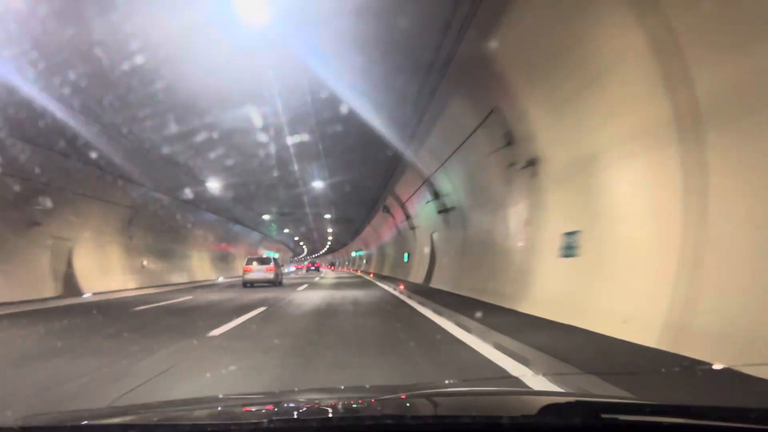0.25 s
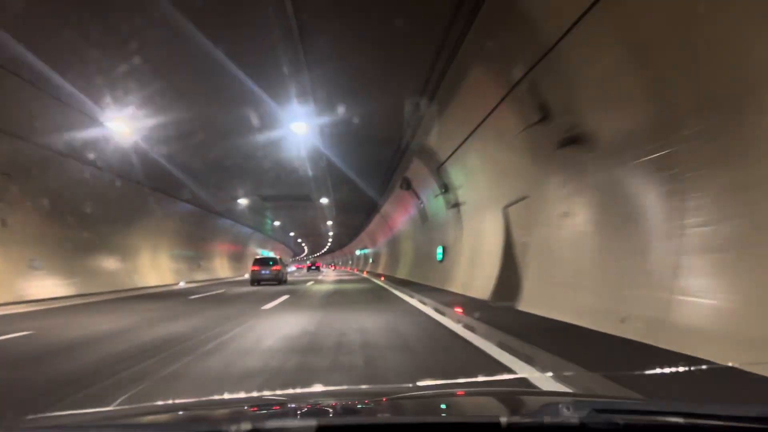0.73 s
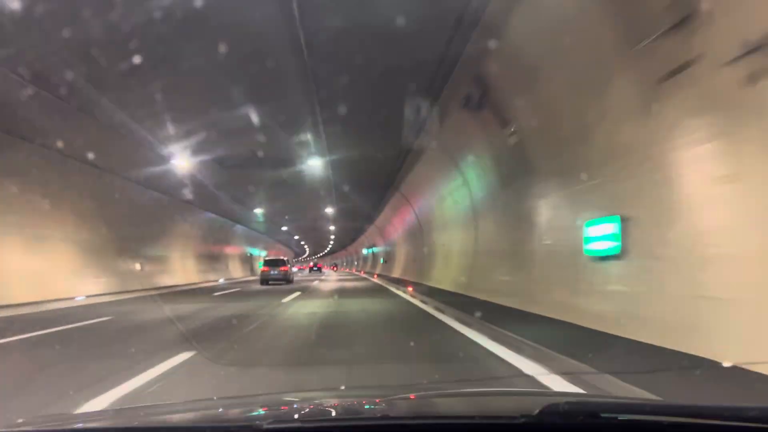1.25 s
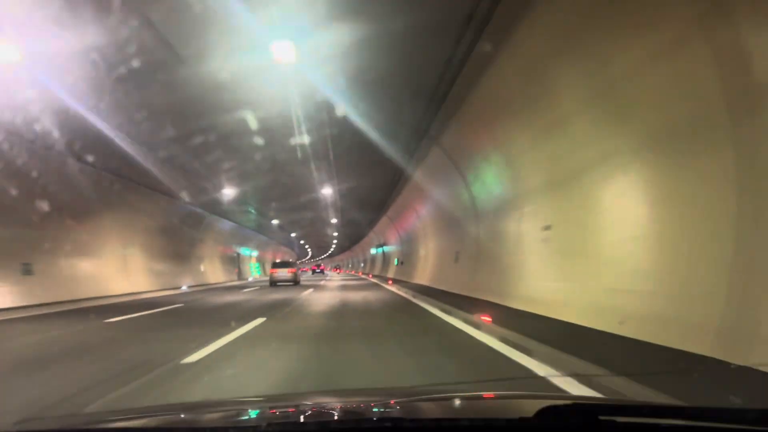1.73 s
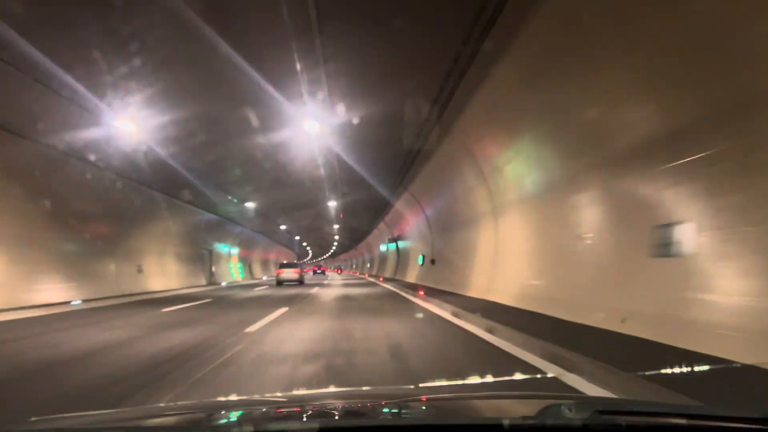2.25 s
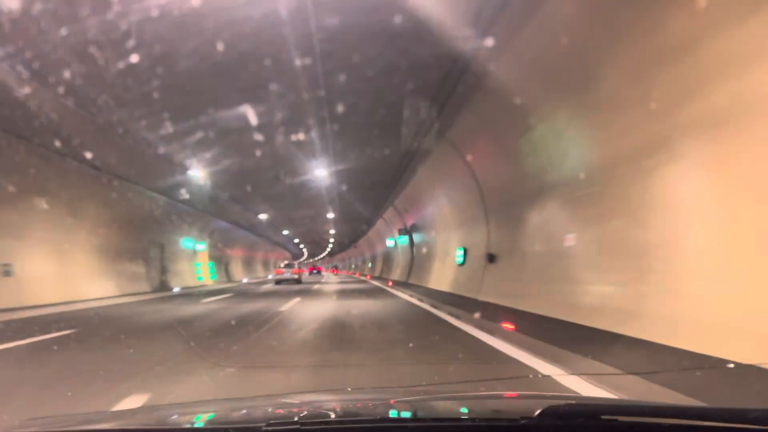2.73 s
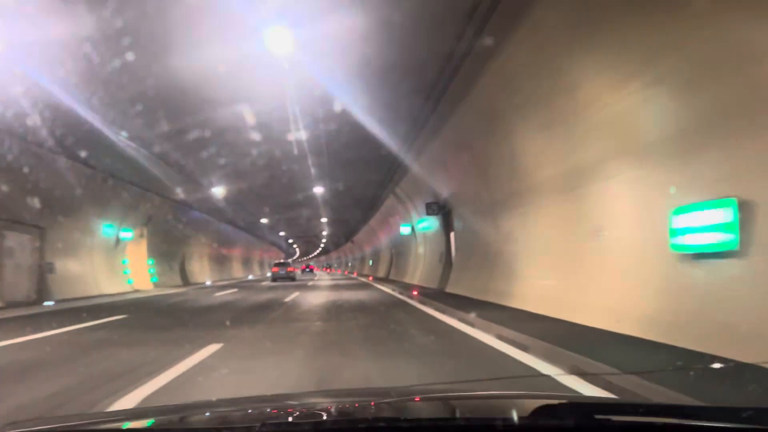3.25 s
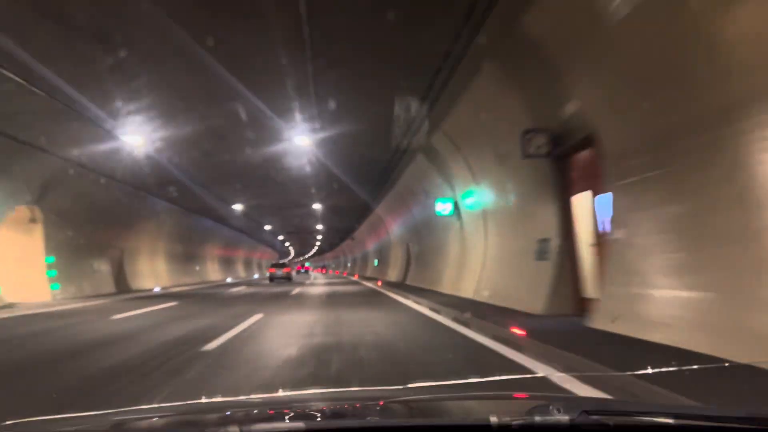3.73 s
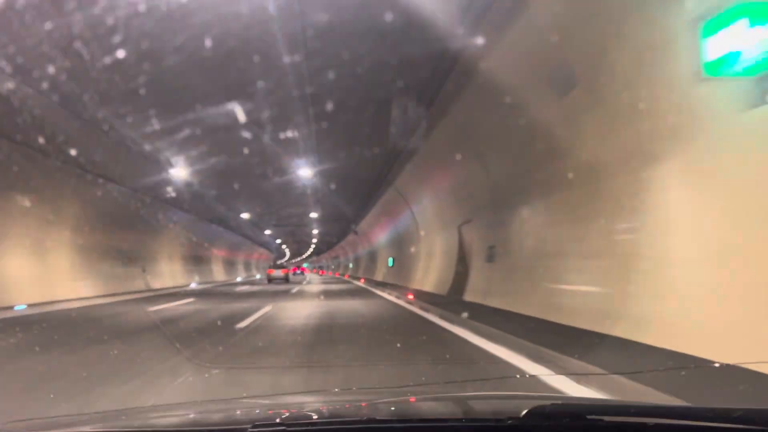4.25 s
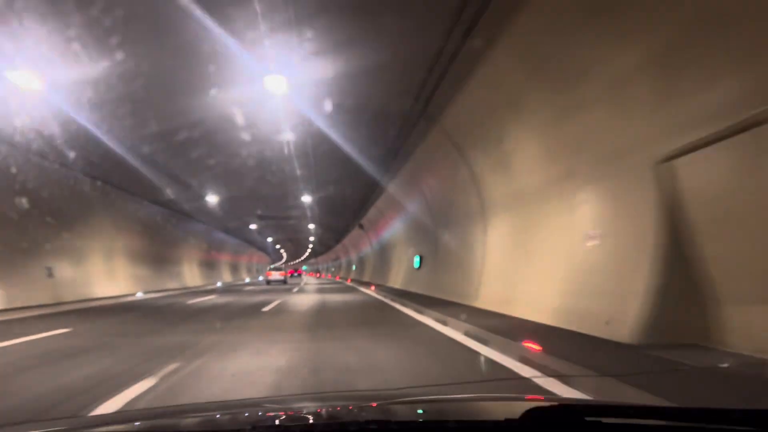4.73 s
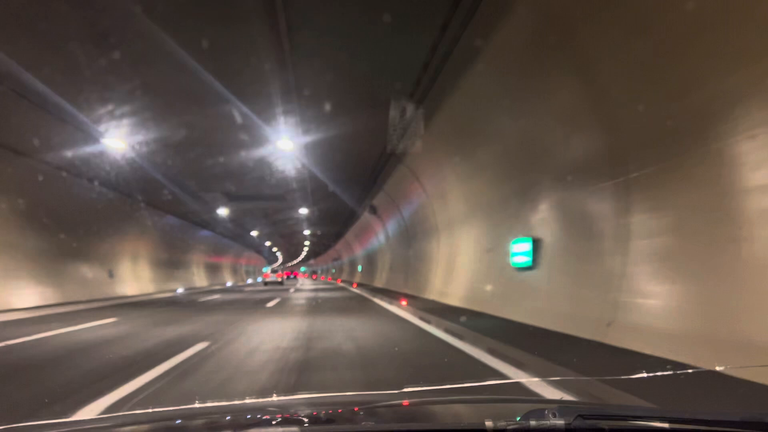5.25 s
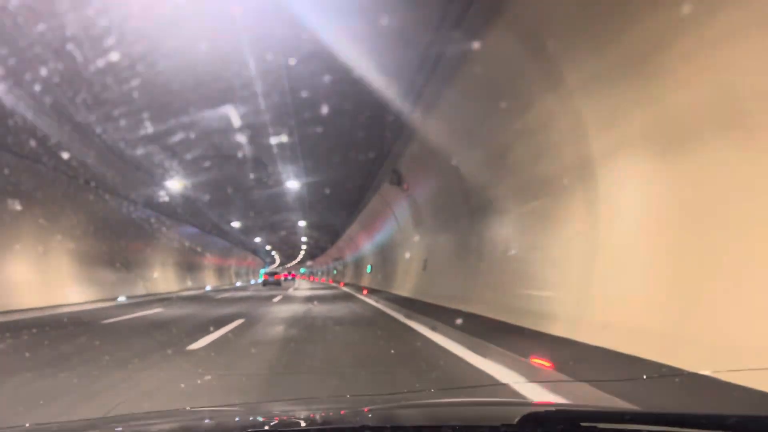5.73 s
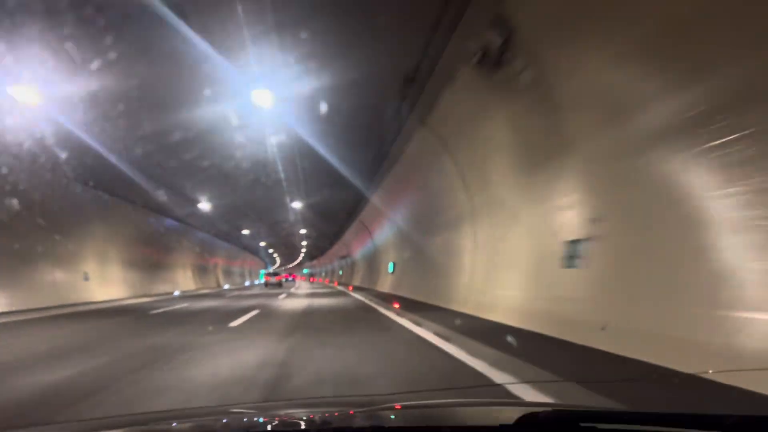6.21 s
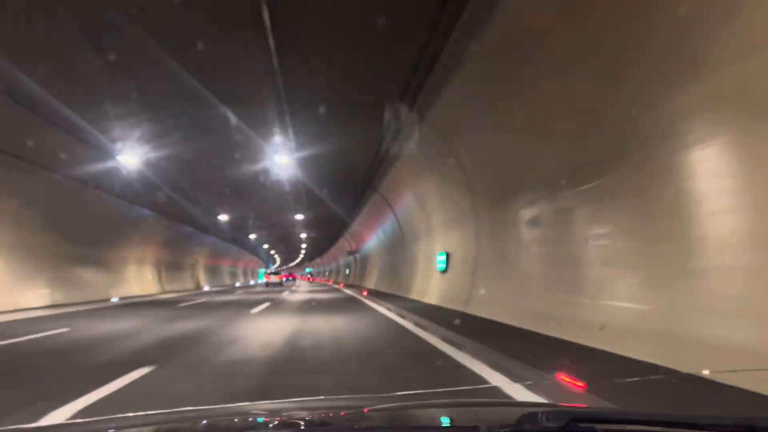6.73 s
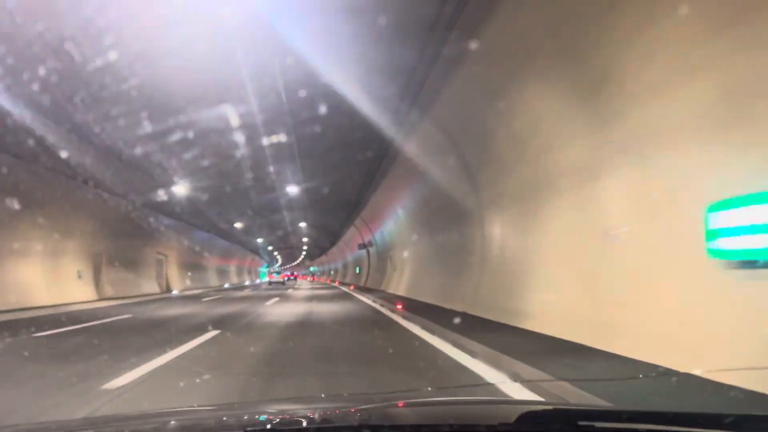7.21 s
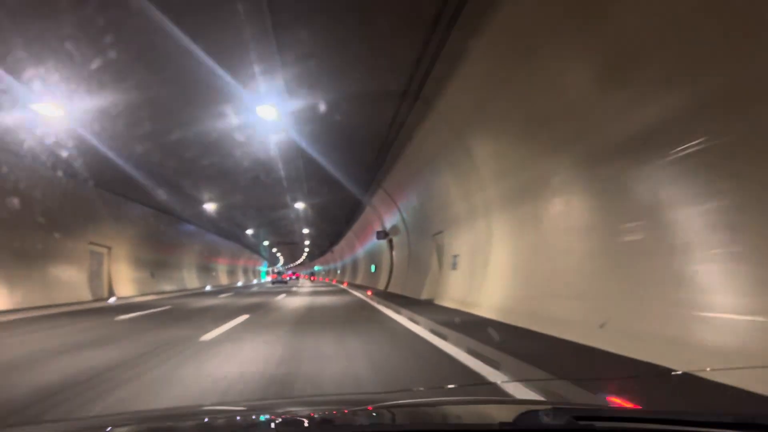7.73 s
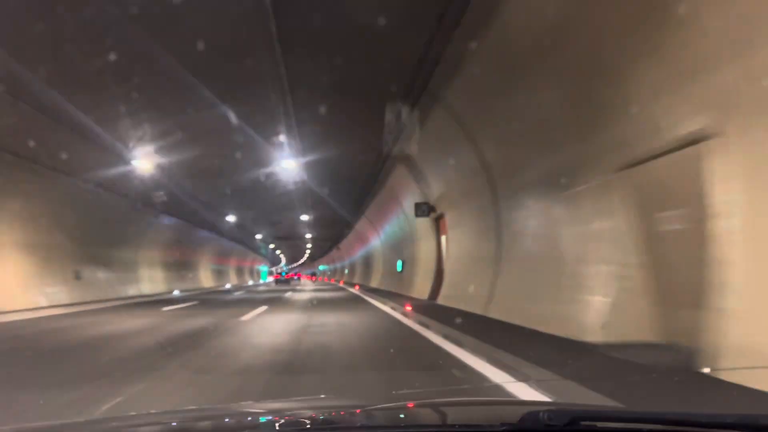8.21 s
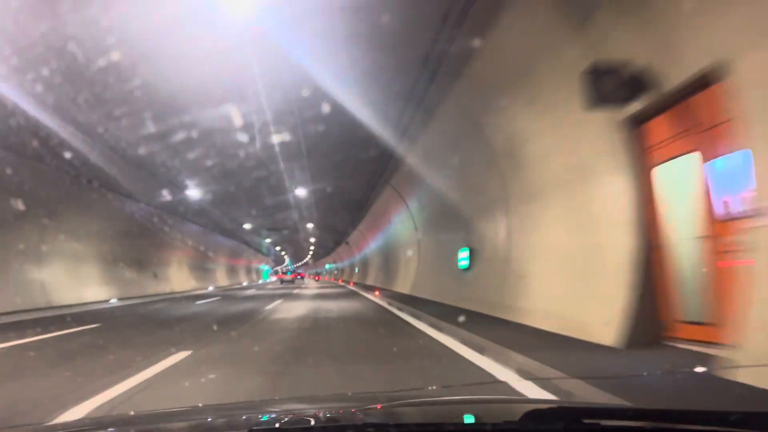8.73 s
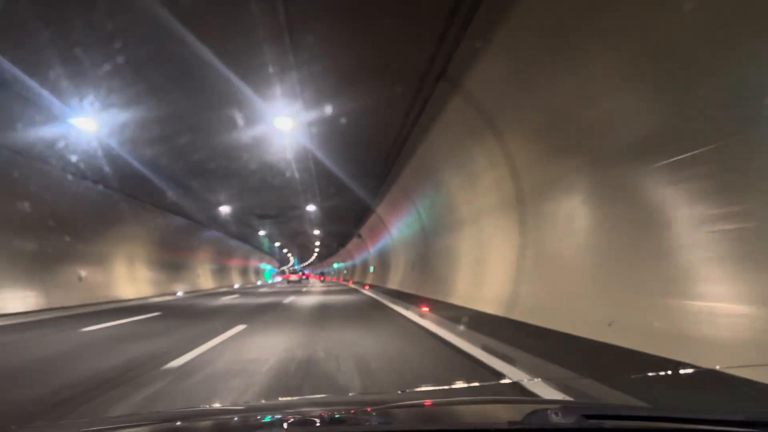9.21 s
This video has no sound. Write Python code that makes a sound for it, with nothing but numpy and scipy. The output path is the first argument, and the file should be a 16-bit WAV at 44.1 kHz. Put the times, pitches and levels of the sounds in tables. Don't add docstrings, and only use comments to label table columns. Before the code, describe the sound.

Steady low cabin boom of a car at speed in a tunnel, throbbing unevenly, with muffled tread roar and a thin hiss of air.

```python
import sys
import numpy as np
from scipy import signal
from scipy.fft import rfft, irfft, next_fast_len
from scipy.io import wavfile
from scipy.ndimage import uniform_filter1d, minimum_filter1d

SR = 44100
rng = np.random.default_rng(int(sys.argv[2]) if len(sys.argv) > 2 else 0)


def linear_from_db(decibels):
    return 10 ** (np.asarray(decibels, float) / 20)


def digitize_waveform(pressure):
    field = np.atleast_2d(pressure).T
    bounded = np.clip(field, -1, 1)
    quanta = np.round(bounded * 32767).astype(np.int16)
    wavfile.write(sys.argv[1], SR, quanta)


N = 417186
SIZE = next_fast_len(N)
HZ = np.fft.rfftfreq(SIZE, 1 / SR)

# time_s, change_db
WIND = [
    (0, 0),
    (1.5, 0),
    (3, .5),
    (4.4, .5),
    (5, -1),
    (6.5, -1),
    (8.3, -1),
    (9.46, 0),
]


def over_time(table):
    time_s, *columns = np.transpose(table)
    return [np.interp(np.arange(N) / SR, time_s, c) for c in columns]


def over_pitch(table):
    pitch_hz, *columns = np.transpose(table)
    return [np.interp(np.log(HZ + 1), np.log(pitch_hz), c) for c in columns]


def walk(rate_hz):
    hold = int(SR / rate_hz)
    steps = np.repeat(rng.standard_normal(N // hold + 1), hold)
    return 1.63 * uniform_filter1d(uniform_filter1d(steps, hold), hold)[:N]


def swells(table, length_s):
    time_s, *columns = np.transpose(table)
    sparse = np.arange(0, N, 64)
    bells = np.exp(-((sparse / SR - time_s[:, None]) / length_s) ** 2)
    return [np.interp(np.arange(N), sparse, c @ bells) for c in columns]


def shaken(colour, even=0., hold_s=.1):
    inside = (HZ > colour[0][0]) * (HZ < colour[-1][0])
    gain = linear_from_db(over_pitch(colour)[0]) * inside
    noise = irfft(rfft(rng.standard_normal((2, SIZE))) * gain, SIZE)[:, :N]
    hold = int(hold_s * SR)
    power = uniform_filter1d(uniform_filter1d(noise ** 2, hold), hold) + 1e-18
    noise = noise / power ** (np.clip(even, 0, 1) / 2)
    return noise / np.sqrt(np.mean(noise ** 2, axis=1, keepdims=True))


def suspension(coarse_db, jolt_db):
    # pitch_hz, density_db
    colour = [(20, -33.5), (29, -24), (36, -8), (46, -1.5), (52, -2.5), (59, -5), (67, -5.5), (76, -9),
              (88, -8.5), (105, -34)]
    return linear_from_db(-26.5 + 0.51 * coarse_db + jolt_db) * shaken(colour, even=.6, hold_s=.14)


def floor_pan(coarse_db, jolt_db):
    # pitch_hz, density_db
    colour = [(68, -38), (80, -13.5), (90, -4), (102, -0.5), (111, -5.5), (126, 3), (133, 0), (143, -4),
              (156, -2), (163, -7), (172, -9.5), (190, -23.5), (220, -41)]
    return linear_from_db(-19 + coarse_db + jolt_db) * shaken(colour, even=0.79, hold_s=0.092)


def panels(coarse_db):
    # pitch_hz, density_db
    colour = [(140, -33.5), (165, -2.5), (185, 1.5), (210, -1.5), (225, -3.5), (237, -5.5), (260, -7.5),
              (300, -9), (330, -12.5), (360, -9.5), (400, -16.5), (450, -27.5), (550, -48.5)]
    level_db = -24.4 + 0.2 * coarse_db + 1.3 * walk(12)
    return linear_from_db(level_db) * shaken(colour, even=0.26, hold_s=0.11)


def tread_roar():
    # pitch_hz, density_db
    colour = [(330, -26.5), (420, -4.5), (470, -8), (560, -3), (640, -3.5), (720, -1), (880, -2), (960, -4),
              (1060, -1), (1300, -3.5), (1500, -9), (1720, -7), (1950, -14.5), (2500, -19.5)]
    level_db = -26.5 + 0.42 * over_time(WIND)[0] + 0.61 * walk(9)
    return linear_from_db(level_db) * shaken(np.vstack([colour, [(3300, -36.0)]]), even=0.34, hold_s=0.3)


def road():
    # time_s, floor_pan_level_db
    surface = [(0, -17.5), (1.5, -16), (1.95, -16), (2.25, -14), (3.5, -14.5), (4.2, -13.5), (5, -14),
               (5.3, -16.5), (6, -15), (7.5, -15), (8.4, -16), (9, -13.5), (9.46, -15.5)]
    # time_s, floor_jolt_db, suspension_jolt_db
    seams = [(.14, 3.5, -1), (.68, 3.5, 3), (1.2, 3.5, -2), (1.66, 5.5, 3), (1.87, -5, -8.5),
             (2.03, 7.5, -1.5), (2.1, -7.5, 0.5), (2.63, 3, -3.5), (2.71, -2.5, 5), (3.03, 3.5, -4.5),
             (3.39, -3.5, 1.5), (3.75, 1, -0.5), (4.12, 2.5, 1), (4.22, -3, -0.5), (4.69, 5, 3.5),
             (4.93, 0.5, -6), (5.4, 1, 5), (5.98, 2, 3.5), (6.17, -4.5, 4.5), (6.6, -4, -0.5),
             (6.79, 3, -0.5), (7.47, 3.5, -2), (7.78, -5, -6), (7.84, 4.5, 3.5), (8.45, 2.5, -3),
             (8.76, -6, 6), (8.96, 1.5, -10.5), (9.17, -2, 4.5)]
    coarse_db = over_time(surface)[0] + 15
    floor_jolt_db, spring_jolt_db = swells(seams, length_s=0.034)
    body = suspension(coarse_db, spring_jolt_db) + floor_pan(coarse_db, floor_jolt_db) + panels(coarse_db)
    return body + tread_roar()


def wind():
    # pitch_hz, density_db
    colour = [(2000, -23.5), (2600, -3), (3000, -2), (3600, -4), (4400, -10), (5400, -12), (6200, -17.5),
              (7000, -23.5), (8200, -24), (9300, -27), (11000, -30.5), (12500, -38), (14500, -40),
              (15800, -36)]
    return linear_from_db(over_time(WIND)[0] - 47.0 + 0.44 * walk(13)) * shaken(colour)


def controls(part, events):
    # time_s, revs_over_cruise_percent
    revs = [
        (0, 0),
        (1.9, -.5),
        (2.4, 0.46),
        (3.5, 3),
        (4.4, 2.5),
        (6, 1.5),
        (7.5, -1.5),
        (9.46, -.5),
    ]
    pitch_hz, follows, rest_db, length_s = part
    level_db = rest_db + swells(events, length_s)[0]
    return level_db, pitch_hz * (1 + follows * over_time(revs)[0] / 100)


def drone(part, events, waver, twice_db):
    level_db, pitch_hz = controls(part, events)
    phase = 2 * np.pi * np.cumsum(pitch_hz) / SR + waver * walk(3)
    return np.sqrt(2) * linear_from_db(level_db) * (np.sin(phase) + linear_from_db(twice_db) * np.sin(2 * phase))


def engine():
    # time_s, change_db
    crank_swells = [(.55, 3.5), (1.03, -7), (1.3, 3), (1.9, -10), (2.8, -5), (5.0, -10), (5.56, 5),
                    (6.6, -7.5), (7, 3.5), (7.6, -11), (8.4, -6), (8.7, 2.5), (8.93, -6), (9.17, 4)]
    # time_s, change_db
    exhaust_swells = [
        (.4, 2),
        (2.1, 7.4),
        (3.2, 3.2),
        (4.2, 3),
        (5.5, 6),
        (7.2, 4),
        (8, 3),
    ]
    crank = drone((40.55, 0.15, -27, 0.05), crank_swells, 0.17, -22.5)
    exhaust = drone((61, .5, -34, 0.48), exhaust_swells, 0.44, -23)
    return crank + exhaust


def wheels():
    # time_s, change_db
    wheel_swells = [(.02, 4.5), (.39, -8), (.68, 8.5), (1.2, 9), (2.4, 6), (2.75, 9), (3.05, 7), (3.85, 7),
                    (4.1, 9), (4.45, 7.5), (4.95, 8.5), (5.5, 8.5), (5.85, 3.5), (7.6, -3), (7.85, 0.5),
                    (8.2, -8), (8.5, 5.5), (9.02, 9)]
    # time_s, change_db
    axle_swells = [(.1, 7), (.8, 5), (1.3, 2), (1.8, -9.5), (2.25, 10.5), (3.5, 7.5), (4.2, -0.5),
                   (4.75, 6), (5.4, 2), (5.9, 5.5), (6.25, 4.5), (6.8, 3), (7.5, 4.5), (9.1, 4.5)]
    # cycles_per_turn, level_db
    orders = [
        (7, -10.5),
        (11, -13.5),
        (14, -23.5),
    ]
    # pitch_hz, percent per percent of revs, rest_db, swell_s
    wheel = (118.5, 0, -25, 0.154)
    axle = (139.5, 0.98, -27, 0.27)
    level_db, pitch_hz = controls(wheel, wheel_swells)
    turn = 2 * np.pi * np.cumsum(pitch_hz / 8) / SR
    beside = np.zeros(N)
    for order, order_db in orders:
        flutter = linear_from_db(np.mean(level_db) + order_db + 2.5 * walk(6))
        beside += flutter * np.sin(order * turn + 1.2 * walk(5))
    return drone(wheel, wheel_swells, 1.12, -21.5) + drone(axle, axle_swells, 1.09, -22.5) + 2 * beside


def whine():
    # pitch_hz, level_db
    tones = [
        (9480, -82),
        (9720, -83.5),
        (15430, -96.5),
    ]
    t = np.arange(N) / SR
    return sum(linear_from_db(db + 3.4 * walk(40)) * np.sin(2 * np.pi * hz * t + 1.5 * walk(40)) for hz, db in tones)


def at_ports(first, second):
    # pitch_hz, likeness_0_to_1, right_leads_rad, left_minus_right_db
    ports = [(40.7, 0.96, .1, .3), (62, 0.96, .1, 0.5), (143, 0.97, 0.34, -0.5), (197, 0.61, 0.18, 2),
             (324, .9, 0.6, -3), (385, .7, 0.64, 0), (450, 0.4, 2.8, 5), (490, .4, 1.5, -4.5),
             (816, 0.66, 3.76, -1), (1050, 0.33, 5.7, -1.5), (1510, 0.2, 6.4, -0.5), (2000, 0.2, 6.6, 0.5),
             (3200, 0.1, 5.6, 1.5), (5200, 0.1, 6.1, 8)]
    # pitch_hz, likeness_0_to_1, right_leads_rad, left_minus_right_db
    ports_treble = [(6200, .1, 6.3, 8), (7000, .7, 6.3, 0), (8360, .45, 7.2, 1), (9250, 0.92, 9.35, 0),
                    (10800, 1, 9.45, 2), (11700, .4, 11, 2.5), (12500, 1, 12.55, -6), (14400, 1, 12.6, -7),
                    (15400, .8, 15.3, -0.5)]
    # pitch_hz, spread_hz, left_db, right_db
    cabin = [(520, 70, 1.5, 0), (678, 46, -1.5, -4), (766, 310, -1.5, 0.5), (994, 97, 2.5, 0.5),
             (1225, 81, -5, -2), (1440, 54, -0.5, -3), (1960, 120, -2, -2.5), (2080, 70, 0, 5),
             (2350, 310, -2, 0), (3620, 330, -4.5, -1.5), (5480, 55, -2.5, -4)]
    like, lead, pan_db = over_pitch(np.vstack([ports, ports_treble]))
    like = np.clip(like, 0, 1)
    left, other = rfft(first, SIZE), rfft(second, SIZE)
    right = like * np.exp(1j * lead) * left + np.sqrt(1 - like ** 2) * other
    cabin_db = sum(np.outer(db, 1 / (1 + (2 * (HZ - hz) / spread) ** 2)) for hz, spread, *db in cabin)
    port_db = cabin_db + np.array([pan_db, -pan_db]) / 2
    return irfft(np.array([left, right]) * linear_from_db(port_db), SIZE)[:, :N]


def scene():
    first, second = road() + wind() + engine() + wheels()
    return at_ports(first, second) + whine()


def top_cut(x):
    return signal.sosfilt(signal.butter(12, 15700, fs=SR, output="sos"), x)


def record(dry):
    ceiling_db, hold_s = -1, .03
    hold = int(hold_s * SR)
    room_left = np.minimum(linear_from_db(ceiling_db) / (np.abs(dry).max(axis=0) + 1e-9), 1)
    held = minimum_filter1d(room_left, 2 * hold)
    gain = uniform_filter1d(uniform_filter1d(held, hold), hold)
    return top_cut(gain * dry)


dry = scene()
out = record(dry)
digitize_waveform(out)
```